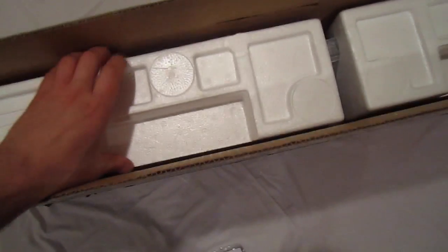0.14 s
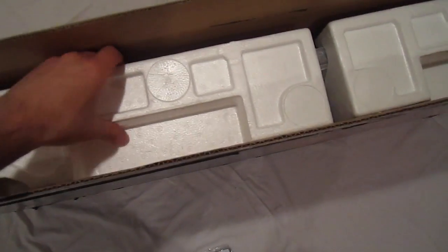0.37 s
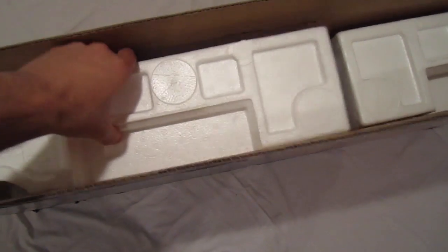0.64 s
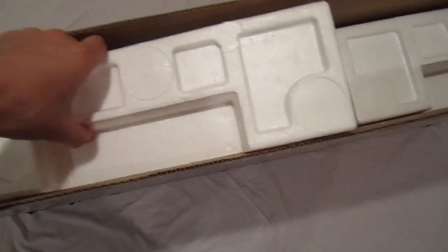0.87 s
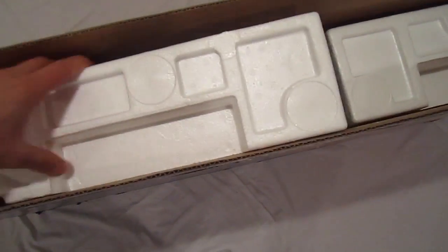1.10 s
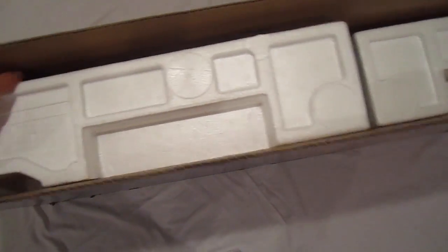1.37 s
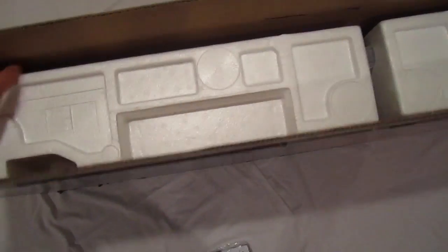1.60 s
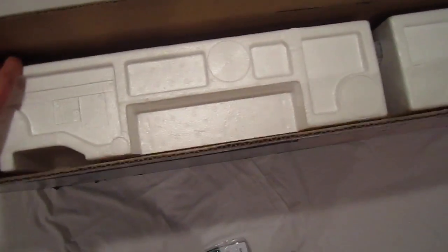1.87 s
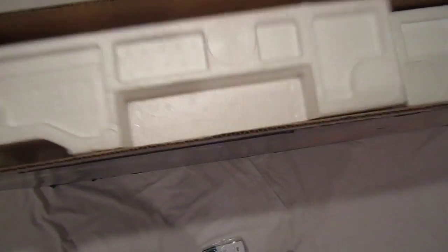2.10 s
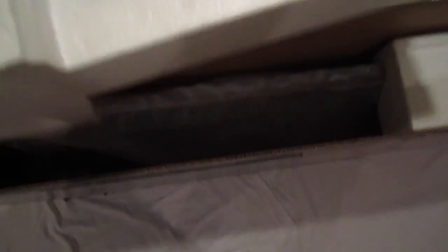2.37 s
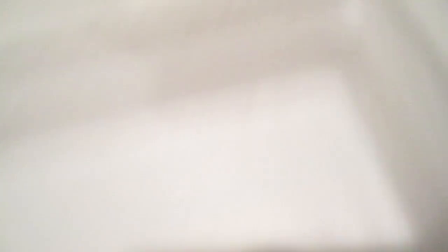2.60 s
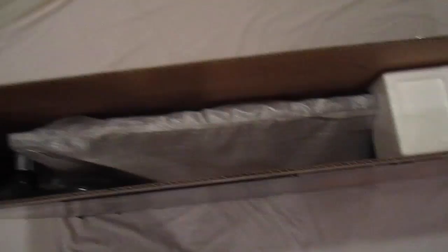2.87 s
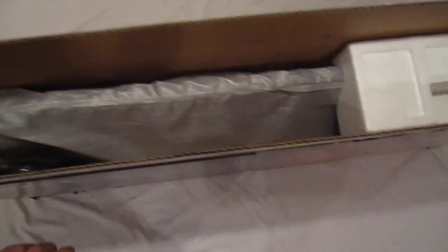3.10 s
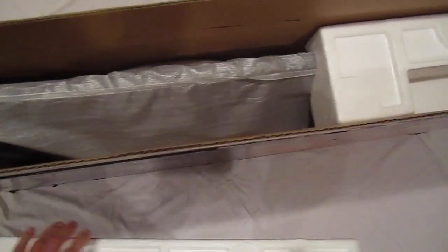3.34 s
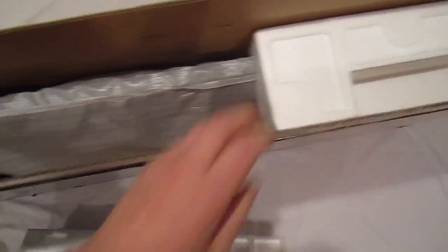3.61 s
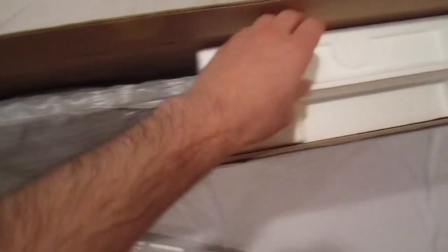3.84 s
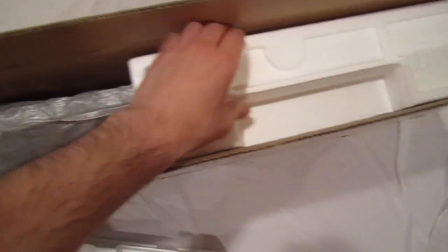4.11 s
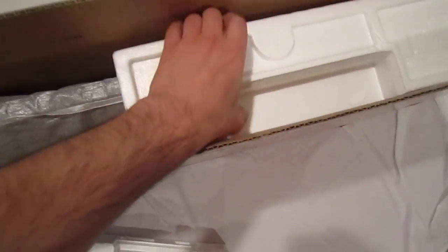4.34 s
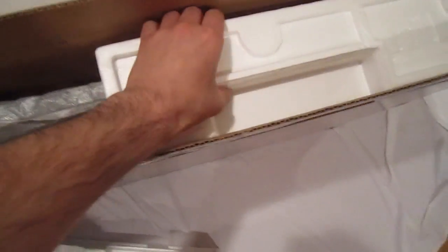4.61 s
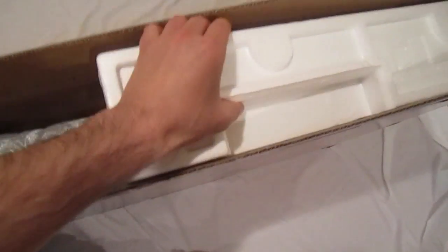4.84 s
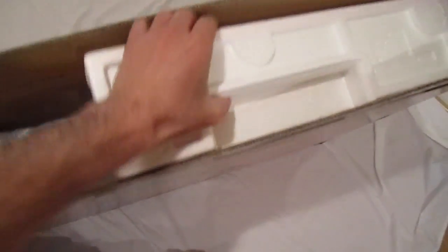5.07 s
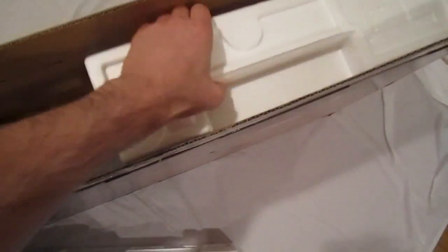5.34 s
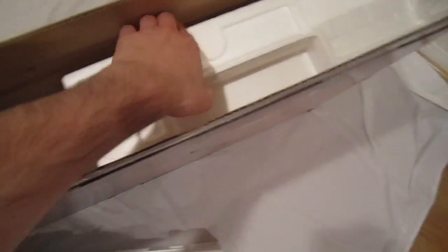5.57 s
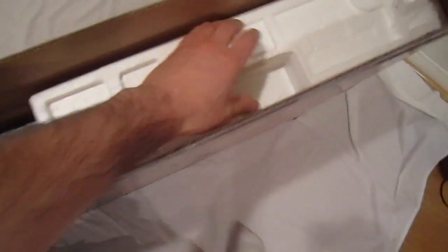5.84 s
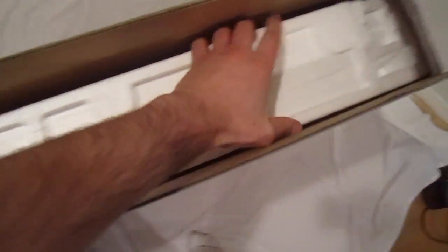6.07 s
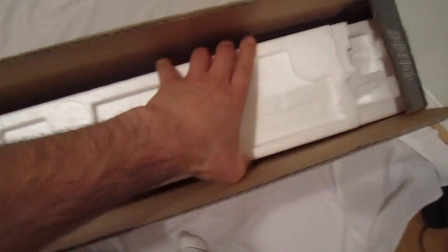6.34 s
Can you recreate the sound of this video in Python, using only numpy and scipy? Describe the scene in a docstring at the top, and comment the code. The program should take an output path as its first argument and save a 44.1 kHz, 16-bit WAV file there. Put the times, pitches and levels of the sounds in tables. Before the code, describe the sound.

Close mono pickup in a quiet room with a soft hiss and a short diffuse tail. From 0 s, brief dry strokes on foam hiss and scrape, with boxy bumps and light taps at 0.3-0.45 s. At 0.7 s a loud, short hollow knock cracks with a sharp snap. Rubbing continues in quick strokes from 1.0 to 1.5 s; knocks and crackles gather from 1.6 s, with a tiny high squeak near 1.95 s. From 2.1 to 2.4 s the lift brings the brightest swish, a strong snap, a small squeal and two knocks. It falls nearly quiet, with faint thuds until 3.1 s. A crackle comes at 3.4 s, then two loud hollow knocks at 3.6 s and another at 4.0 s with a low squeak and crackle. Softer scrapes, a snap at 4.4 s, bumps and crackle at 5.3 s follow, then rubbing and small knocks from 5.9 to the end around 6.4 s.

```python
"""A hand drags foam blocks about in a cardboard box and lifts one out, close to a mono microphone in a quiet room.
From the start, friction noise hisses and scrapes while the strokes and shoves drive the blocks' modes and the
box wall; soon knocks ring the same modes as decaying sines, and a diffuse room tail answers them. Then the
wrap snaps in decaying bursts of crackle and the foam squeals briefly as gliding, roughened tones. From 3.1 s
the hand works a second block, with its own balance of modes."""
import sys
import numpy as np
from scipy import signal
from scipy.fft import rfft, irfft, next_fast_len
from scipy.io import wavfile
from scipy.ndimage import uniform_filter1d, map_coordinates

SR = 44100
rng = np.random.default_rng(int(sys.argv[2]) if len(sys.argv) > 2 else 0)


def elevation(decibels):
    """Turn decibel levels (scalar or array-like) into linear amplitude ratios."""
    levels = np.asarray(decibels, float)
    return 10 ** (levels / 20)


def master_out(mix):
    """Clip the mix to full scale and print it as 16-bit PCM to the path in sys.argv[1]."""
    frames = np.transpose(np.atleast_2d(mix))
    ceiling = np.clip(frames, -1, 1)
    pcm = np.round(ceiling * 32767).astype(np.int16)
    wavfile.write(sys.argv[1], SR, pcm)


N = 284621  # samples

# quiet room noise, relative spectrum: (frequency [Hz], density [dB per Hz])
QUIET_SPECTRUM = [(30, -8), (649, -28.5), (1160, -25), (9970, -43), (16000, -53)]
# strokes over foam, card and wrap: (start [s], length [s], hiss level [dB], scrape level over the hiss [dB])
STROKES = [(-0.05, 0.059, -38.5, 0), (0.066, 0.07, -37, -5.5), (0.146, 0.076, -33.5, -3.5),
           (0.278, 0.057, -37.5, 1.5), (0.412, 0.079, -39, 1), (0.595, 0.22, -37.5, -2.5),
           (0.873, 0.17, -50, 3), (1.028, 0.051, -33, -0.5), (1.141, 0.15, -35, -3.5),
           (1.289, 0.13, -35, -1), (1.436, 0.11, -35, -3), (1.789, 0.75, -49, 5),
           (2.08, 0.099, -31.5, -8.5), (2.188, 0.12, -29, -8.5), (2.348, 0.089, -26, -33.5),
           (3.226, 0.16, -59.5, 12.5), (3.277, 0.094, -44, -4.5), (3.626, 0.11, -44, 11),
           (3.869, 0.14, -43.5, -7), (4.178, 0.13, -48, -1), (4.334, 0.17, -42.5, -4),
           (4.607, 0.052, -41.5, -3.5), (4.661, 0.14, -39, -5.5), (4.888, 0.14, -50, -2),
           (5.003, 0.19, -44, -2), (5.285, 0.3, -37, -7.5), (5.564, 0.16, -36.5, -4),
           (5.81, 0.32, -50, -15), (5.958, 0.24, -39, -1), (6.262, 0.11, -36.5, -0.5)]
# shoves that shake the blocks and jostle the box: (start [s], length [s], block level [dB], jostle level [dB])
SHOVES = [(-0.02, 0.045, -37, -31.5), (0.25, 0.14, -43, -43), (0.435, 0.086, -38.5, -45),
          (0.68, 0.025, -29.5, -58), (1.62, 0.075, -35, -33.5), (1.84, 0.15, -39.5, -38.5),
          (2.1, 0.095, -50, -38), (2.355, 0.027, -29.5, -27.5), (3.24, 0.1, -58, -79),
          (3.666, 0.035, -23, -30.5), (3.78, 0.34, -32.5, -48), (3.98, 0.068, -27, -52),
          (4.385, 0.12, -44, -46), (4.7, 0.15, -45.5, -44.5), (5.333, 0.055, -36, -40.5),
          (6.055, 0.2, -37, -41.5)]
# relative spectra of hiss, scrape and jostle: (frequency [Hz], density [dB per Hz])
HISS_SPECTRUM = [(1470, -35), (3080, -9), (4170, -3.5), (11600, -4), (16000, -16.5)]
SCRAPE_SPECTRUM = [(600, 9.5), (2200, 4.5), (3500, -2.5), (6000, -23)]
JOSTLE_SPECTRUM = [(20, -3), (110, 4), (190, 9), (320, -1)]
# modes of the foam blocks: (frequency [Hz], relative level in first block [dB], in second block [dB])
BLOCK_MODES = [(199.4, 2.5, 5), (239.4, 1, 5.5), (326, 6, 6), (380.3, 2.5, 6), (453, 2, 3), (548, -1.5, 3),
               (660, -3, 1.5), (800, 7, -5), (977, 4.5, 10.5), (1156, -0.5, 5.5), (1287, -18, 7),
               (1913, -12, -19)]
# knocks: (time [s], peak level of the ring [dB], pitch the contact favours [Hz],
#          decay rate of the ring [factor on the usual rate; below 1 rings longer, above 1 is duller and shorter])
KNOCKS = [(0.318, -26.5, 193, 0.36), (0.366, -19, 700, 0.24), (0.431, -24, 456, 1.6),
          (0.454, -27, 148, 0.71), (0.684, -6.5, 315, 1.9), (0.693, -23, 336, 0.9),
          (0.704, -17.5, 120, 1.4), (1.063, -21, 790, 0.56), (1.101, -23, 787, 0.54),
          (1.6024, -20.5, 428, 0.39), (1.661, -23, 180, 0.61), (2.004, -23.5, 891, 0.22),
          (2.076, -21, 1270, 1.5), (2.222, -19, 734, 0.25), (2.346, -13.5, 1080, 0.3),
          (2.353, -14, 505, 2.4), (2.757, -34, 1244, 0.76), (2.916, -37, 54.5, 1), (2.939, -29, 99, 0.58),
          (3.062, -45, 51, 0.89), (3.6221, -9.5, 397, 0.16), (3.664, -9, 696, 0.19),
          (3.977, -15, 417, 0.41), (4.334, -29, 800, 0.48), (4.391, -22, 733, 0.37),
          (4.705, -35, 294, 0.74), (4.787, -26, 397, 0.5), (5.2834, -24, 800, 0.53),
          (5.336, -19.5, 386, 0.28), (5.341, -28.5, 89, 0.11), (5.93, -33, 696, 0.16),
          (6.063, -23.5, 574, 0.28), (6.153, -27.5, 660, 0.59), (6.219, -20.5, 135, 0.64),
          (6.345, -25, 620, 1.2)]
# reverberation: (frequency [Hz], t60 [s])
ROOM_DECAY = [(200, 0.61), (12000, 0.58)]
# snaps of wrap and foam beads: (time [s], approximate peak level [dB], t60 [s])
SNAPS = [(0.6991, -2.5, 0.038), (1.717, -19, 0.086), (1.846, -11.5, 0.045), (1.941, -10, 0.06),
         (2.008, -13.5, 0.17), (2.223, -5.5, 0.062), (2.7565, -23, 0.04),  (3.232, -33, 0.054),
         (3.366, -16.5, 0.099), (3.664, -27, 0.0092), (4.073, -18.5, 0.21), (4.394, -12.5, 0.062),
         (5.283, -21, 0.04), (5.2967, -12, 0.037), (6.2217, -14.5, 0.019)]
# stick-slip squeals: (start [s], end [s], start frequency [Hz], end frequency [Hz], rms level [dB])
SQUEALS = [(1.934, 1.973, 3500, 3080, -39), (2.291, 2.337, 726, 550, -29), (4.01, 4.061, 411, 388, -23.5),
           (4.74, 4.785, 314, 191, -45)]

SECOND_BLOCK_S = 3.1  # from here on the hand works the second block
WALL_HZ, WALL_T60_S = 142.3, 0.72  # the long box wall
BED_HZ = 115  # duller thuds are cushioned by the bed and leave the wall still
STROKE_RISE_S, HISS_FADE_DB_PER_S, SCRAPE_FADE_DB_PER_S = 0.053, 81, 56
TREBLE_HZ, TREBLE_FADE_DB_PER_S = 8300, 170  # the top of the hiss dies first
SHOVE_RISE_S, BLOCK_FADE_DB_PER_S, JOSTLE_FADE_DB_PER_S = 0.0056, 102, 175
SCRAPE_SHAKES_DB, SCRAPE_JOSTLES_DB = -7.5, -11.5  # scraping also shakes blocks and box a little
STOP_DB = 5  # the sudden drop when the hand stops


def unit(x):
    """Normalization: the signal scaled to rms 1."""
    return x / np.sqrt(np.mean(x ** 2) + 1e-20)


def along(points, hz):
    """Interpolation of (Hz, value) points on a logarithmic frequency axis."""
    f, v = np.transpose(points)
    return np.interp(np.log(hz + 1), np.log(f + 1), v)


def filtered(x, response):
    """Linear filtering: the spectrum multiplied by a frequency response."""
    m = next_fast_len(N + SR)
    return irfft(rfft(x, m) * response(np.fft.rfftfreq(m, 1 / SR)), m)[:N]


def coloured(x, spectrum):
    """Spectral shaping: x weighted by the given curve, silent far outside it, rms 1."""
    low_hz, high_hz = spectrum[0][0] / 2, spectrum[-1][0] * 2
    closed = [(low_hz, -90), *spectrum, (high_hz, -90)]
    return unit(filtered(x, lambda hz: elevation(along(closed, hz))))


def quiet_room():
    """Background noise: stationary Gaussian noise of fixed spectrum."""
    return elevation(-57.0) * coloured(rng.standard_normal(N), QUIET_SPECTRUM)


def effort(events, column, rise_s, fade_db_per_s):
    """Gain envelope: events rise, hold, drop as the hand stops and fade; their powers add."""
    t = np.arange(0, N + 32, 32) / SR
    power = 0
    for row in events:
        since = t - row[0]
        fade_db = fade_db_per_s * np.maximum(since - row[1], 0)
        stop_db = STOP_DB * (since > row[1])
        gain = np.clip(since / rise_s, 0, 1) * elevation(row[column] - fade_db - stop_db)
        power = power + gain ** 2
    return np.interp(np.arange(N) / SR, t, np.sqrt(power))


def friction(grain_db, flutter_db, rate):
    """Dry friction: noise of tiny slips with long-tailed sizes; pressure flutters at rate values a second."""
    flutter = map_coordinates(rng.standard_normal(N // 50), [np.arange(N) * rate / SR])
    sizes = np.minimum(rng.exponential(1, N // 20 + 1), 4)
    clumps = np.repeat(sizes, 20)[:N]
    return rng.standard_normal(N) * elevation(grain_db * clumps + flutter_db * flutter)


def patchy(x, depth_db):
    """Changing contact: patches of the spectrum swell and fade at random."""
    z = signal.stft(x, nperseg=512)[2]
    across_hz = uniform_filter1d(rng.standard_normal(z.shape), size=4, axis=0)
    field = uniform_filter1d(across_hz, size=12, axis=1)
    return signal.istft(z * elevation(depth_db * unit(field)), nperseg=512)[1][:N]


def resonance(hz, centre_hz, t60):
    """Damped oscillator: frequency response of one mode that dies 60 dB in t60."""
    width = np.log(1000) / (np.pi * t60)
    return 1j * hz * width / (centre_hz ** 2 - hz ** 2 + 1j * hz * width)


def ring_time(hz):
    """Internal loss: in foam the usual t60 of a block mode shortens with its pitch."""
    return 0.019 * (400 / hz) ** 0.2


def ringing(drive, modes, hold):
    """Modal superposition: noise drives the block in hand, rms 1; hold stretches the ring."""
    def response(hz, block):
        total = 0
        for k, mode in enumerate(modes):
            peak = resonance(hz, mode[0], hold * ring_time(mode[0]))
            total = total + (-1) ** k * elevation(mode[block]) * peak
        return total

    first, second = (unit(filtered(drive, lambda hz: response(hz, block))) for block in (1, 2))
    return np.where(np.arange(N) / SR < SECOND_BLOCK_S, first, second)


def hiss_and_scrape(scrape):
    """Sliding friction: one slip noise is heard as bright hiss, whose top fades sooner, and as lower scrape."""
    body_gain = effort(STROKES, column=2, rise_s=STROKE_RISE_S, fade_db_per_s=HISS_FADE_DB_PER_S)
    top_gain = effort(STROKES, column=2, rise_s=STROKE_RISE_S, fade_db_per_s=TREBLE_FADE_DB_PER_S)
    slips = patchy(friction(grain_db=1.0, flutter_db=1.04, rate=70), depth_db=2.0)
    bright = coloured(slips, HISS_SPECTRUM)
    top = filtered(bright, lambda hz: 1 / (1 + (TREBLE_HZ / (hz + 1)) ** 4))
    hiss = body_gain * (bright - top) + top_gain * top
    return hiss + scrape * coloured(slips, SCRAPE_SPECTRUM)


def shaken_blocks(scrape):
    """Forced vibration: juddering friction excites the modes of the foam blocks."""
    shove = effort(SHOVES, column=2, rise_s=SHOVE_RISE_S, fade_db_per_s=BLOCK_FADE_DB_PER_S)
    shake = np.hypot(shove, elevation(SCRAPE_SHAKES_DB) * scrape)
    judder = friction(grain_db=2.5, flutter_db=0.9, rate=98)
    hollow = shake * ringing(patchy(judder, depth_db=1), BLOCK_MODES[:7], hold=5)
    # the upper modes answer both the shaking and the scraping
    upper_gain = np.hypot(elevation(-11.5) * shake, elevation(-11) * scrape)
    return hollow + upper_gain * ringing(judder, BLOCK_MODES[6:], hold=1.17)


def jostled_box(scrape):
    """Resonance: low push noise is heard directly and through the mode of the box wall."""
    shove = effort(SHOVES, column=3, rise_s=SHOVE_RISE_S, fade_db_per_s=JOSTLE_FADE_DB_PER_S)
    jostle = np.hypot(shove, elevation(SCRAPE_JOSTLES_DB) * scrape)
    push = jostle * coloured(friction(grain_db=1, flutter_db=3.5, rate=18), JOSTLE_SPECTRUM)
    wall = filtered(push, lambda hz: resonance(hz, WALL_HZ, WALL_T60_S))
    return push + elevation(8.5) * wall


def rubbing():
    """Excitation and response: strokes and shoves sound as friction, block modes and box wall."""
    pressing = [(s, length, db + over_db) for s, length, db, over_db in STROKES]
    scrape = effort(pressing, column=2, rise_s=STROKE_RISE_S, fade_db_per_s=SCRAPE_FADE_DB_PER_S)
    return hiss_and_scrape(scrape) + shaken_blocks(scrape) + jostled_box(scrape)


def knocks():
    """Impact excitation: contacts ring block modes near their own pitch and, close to its mode, the wall."""
    out, t = np.zeros(N + SR), np.arange(SR // 2) / SR
    hz, first_db, second_db = np.transpose(BLOCK_MODES)[:, :, None]
    sign = (-1) ** np.arange(len(BLOCK_MODES))[:, None]  # neighbouring modes start in opposite directions
    scatter_db = rng.normal(0, 3, (len(KNOCKS), len(BLOCK_MODES), 1))
    # the surfaces meeting
    tap = filtered(rng.standard_normal(N), lambda f: f / (f + 700) / (1 + (f / 2500) ** 2))
    for (s, db, pitch_hz, decay_rate), chance_db in zip(KNOCKS, scatter_db):
        at = round(s * SR)
        level_db = first_db if s < SECOND_BLOCK_S else second_db
        reach_db = -13 * np.abs(np.log2(hz / pitch_hz))  # modes far from the contact pitch get less
        fading = elevation(level_db + reach_db + chance_db - 60 * t * abs(decay_rate) / ring_time(hz))
        modes = np.sum(sign * fading * np.sin(2 * np.pi * hz * t), axis=0)
        # the struck spot itself
        spot_fading = elevation(7.5 - 60 * t * abs(decay_rate) / ring_time(pitch_hz))
        spot = spot_fading * np.sin(2 * np.pi * pitch_hz * t)
        ring = (modes + spot) * (1 - np.exp(-t * pitch_hz / 0.4))  # dull contacts are soft and start slowly
        wall_db = -9 - 25 * abs(np.log2(WALL_HZ / pitch_hz)) if pitch_hz > BED_HZ else -120
        wall = elevation(wall_db - 60 * t / WALL_T60_S) * np.sin(2 * np.pi * WALL_HZ * t)
        wall = wall * (1 - np.exp(-t / 0.0032))
        crack_gain = min(1, pitch_hz / 900) * elevation(1.5 - 60 * t / 0.045)
        crack = crack_gain * np.roll(tap, -at)[:len(t)]
        out[at:][:len(t)] += elevation(db) * (ring / np.abs(ring).max() + wall + crack)
    return out[:N]


def room(x):
    """Reverberation: each frequency of a noise tail has its own decay; the tail is new every quarter second."""
    out, hop = np.zeros(N + SR), SR // 4
    delay = SR // 200  # 5 ms
    for at in range(0, N, hop):
        hz, t, z = signal.stft(rng.standard_normal(SR // 2), SR, nperseg=256)
        decay = elevation(-60 * t / along(ROOM_DECAY, hz)[:, None])
        tail = signal.istft(z * decay, SR, nperseg=256)[1]
        answer = signal.fftconvolve(x[at:at + hop], tail / np.linalg.norm(tail))
        out[at + delay:][:len(answer)] += answer
    return out[:N]


def snaps():
    """Impulsive release: a sudden burst of crackle that decays exponentially."""
    gain, t = np.zeros(N + SR), np.arange(SR // 4) / SR
    for s, db, t60 in SNAPS:
        # noise peaks stand well over its rms, hence the 17 dB
        gain[round(s * SR):][:len(t)] += elevation(db - 17.0 - 60 * t / max(t60, 0.005))
    slips = friction(grain_db=1.0, flutter_db=1.5, rate=150)
    crackle = filtered(slips, lambda hz: hz / (hz + 1200) / (1 + (hz / 9000) ** 2))
    return gain[:N] * unit(crackle)


def squeals():
    """Stick-slip oscillation: a gliding tone of unsteady strength swells, then lets go at once."""
    out = np.zeros(N)
    for start, end, from_hz, to_hz, db in SQUEALS:
        u = np.linspace(0, 1, round((end - start) * SR))
        pitch_hz = to_hz + (from_hz - to_hz) * (1 - u) ** 3
        phase = 2 * np.pi * np.cumsum(pitch_hz) / SR
        # the higher the squeal, the more broken it is
        wander = map_coordinates(rng.standard_normal(50), [u * (end - start) * to_hz / 6])
        rough = unit(1 + to_hz / 1800 * wander)
        tone = np.sqrt(2) * rough * np.minimum(1, 8 * u) * np.sin(phase)
        out[round(start * SR):][:len(u)] += elevation(db) * tone
    return out


def scene():
    """Superposition: all sources add at one microphone, feeding two equal channels."""
    background = quiet_room()
    rubbed = rubbing()
    hits = knocks() + snaps() + squeals()
    mono = background + rubbed + hits + elevation(-6.5) * room(hits)
    return np.array([mono, mono])


def band_limit(x):
    """A steep low-pass at the top of the band."""
    return signal.sosfilt(signal.butter(12, 16480, fs=SR, output="sos"), x)


def record(dry):
    mix = np.array([filtered(x, lambda hz: hz < 15830) for x in dry])
    return band_limit(mix)


dry = scene()
out = record(dry)
master_out(out)
```